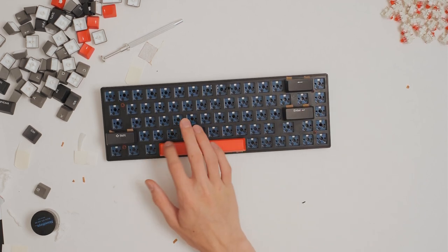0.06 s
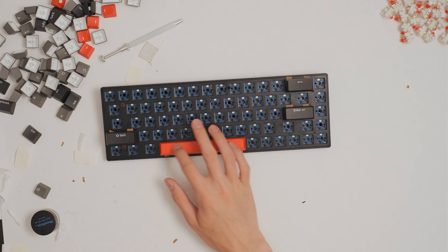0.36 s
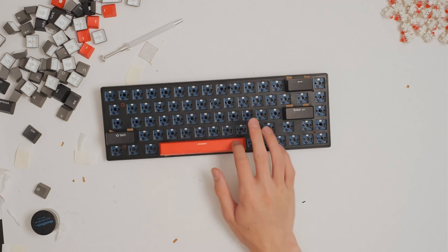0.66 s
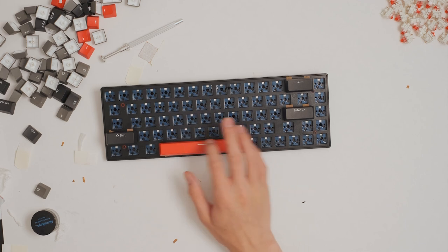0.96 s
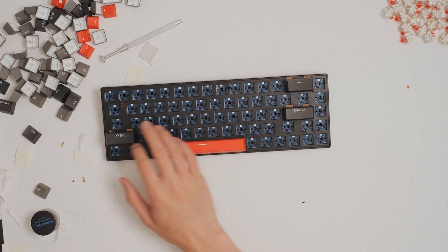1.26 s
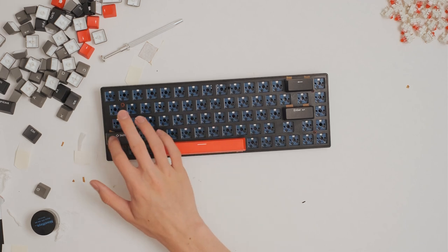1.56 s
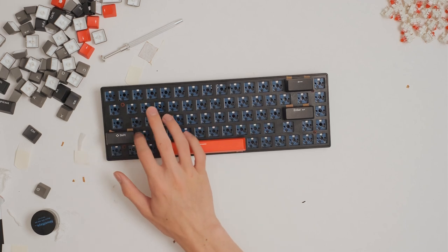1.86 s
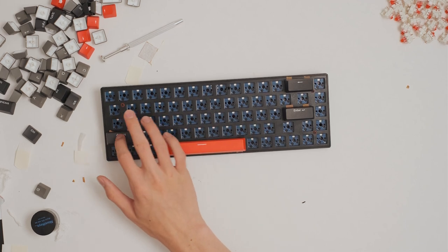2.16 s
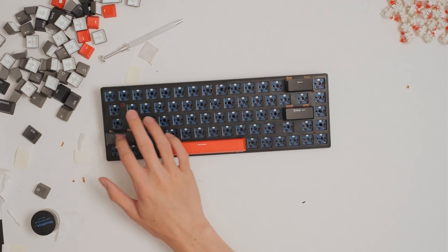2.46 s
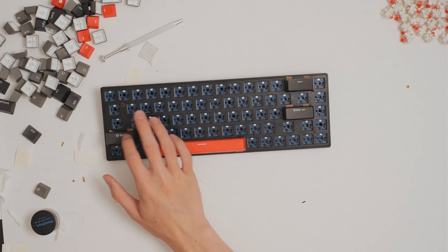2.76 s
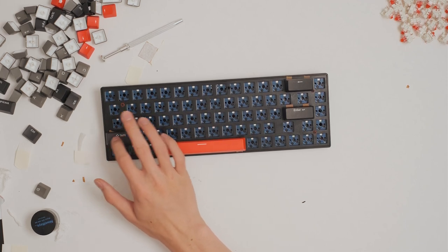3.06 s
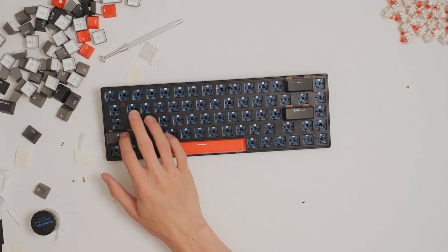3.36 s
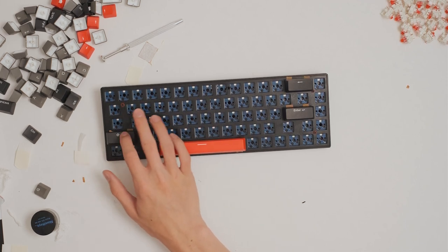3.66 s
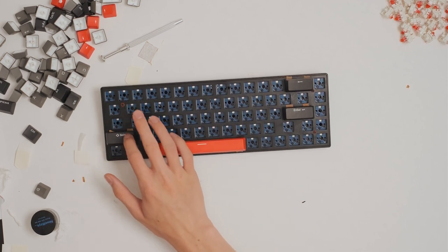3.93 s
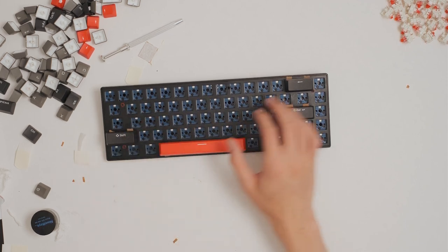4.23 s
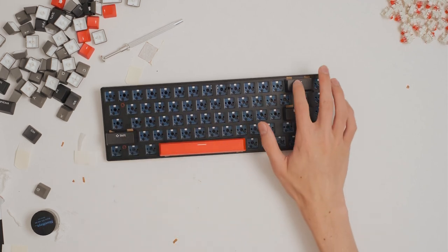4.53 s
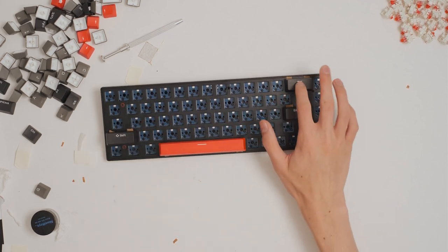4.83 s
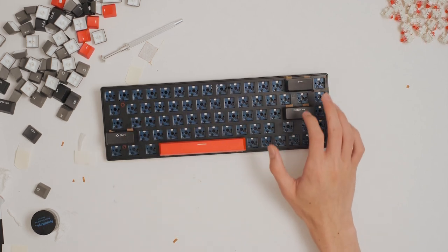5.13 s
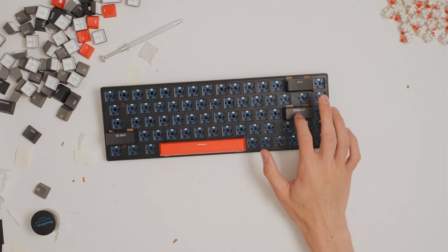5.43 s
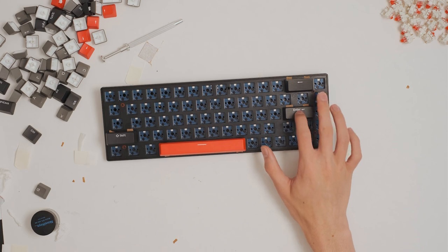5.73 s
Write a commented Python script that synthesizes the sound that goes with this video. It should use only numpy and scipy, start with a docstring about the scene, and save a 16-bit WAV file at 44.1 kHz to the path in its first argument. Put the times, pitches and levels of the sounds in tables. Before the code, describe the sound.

Single keys on a mechanical keyboard are tapped in steady runs: loud clacks, lighter ticks, then a few sharp, rattly clacks.

```python
"""One hand tries the big keys of a mechanical keyboard on a desk, in a small room, almost in mono.
At first the room still rings from an earlier tap. Then come seven taps on the space bar, fifteen on left
shift (with one stray knock), three on backspace (the last makes a spring sing) and three on enter.
In each tap the finger lands and the key's stem slides down and hits bottom: the keycap clacks and the
case thuds. The key then springs back against its top stop. A faint hum lies under it all."""
import sys
import numpy as np
from scipy import signal
from scipy.fft import rfft, irfft
from scipy.io import wavfile

SR = 44100
rng = np.random.default_rng(int(sys.argv[2]) if len(sys.argv) > 2 else 0)


def transcribe(signal):
    """Save signal, clipped to [-1, 1], as a 16-bit WAV file at the path in sys.argv[1]."""
    frames = np.atleast_2d(signal).T
    limited = np.clip(frames, -1, 1)
    pcm = np.round(limited * 32767).astype(np.int16)
    wavfile.write(sys.argv[1], SR, pcm)


N = 264159
AGE = np.arange(int(.18 * SR)) / SR   # seconds since a blow
SPLIT_HZ = 3900   # a keycap's tones clack below this pitch and tick above it

# The tones of the space bar's cap and steadying wire, then of the case struck at the front.
# Ring time, or t60, is how long a sound takes to fade by 60 dB.
# (pitch [Hz], relative energy [dB], ring time [s])
SPACE_CAP = [(1430, -23, 0.0089), (1893, -8.5, 0.0092), (2388, -5, .014), (2707, -4.5, .014),
             (3030, 0.5, 0.0064), (3402, 3.5, 0.019), (3420, -16.5, .17), (3684, -19.5, .16),
             (4380, -18.5, .006), (4990, -6.5, 0.011), (5550, -11, .007), (6760, -19, 0.0059),
             (7930, -25, 0.01457)]
CASE_FRONT = [(135, -12, 0.05), (217, -16, .2), (268.6, -0.5, 0.042), (361, -7.5, 0.029), (336, 2.5, 0.035),
              (483, -5, 0.051)]
# Taps on the space bar. Where the finger lands tilts the clack: a higher tilt weakens its low tones.
# (time [s], press level [dB], time held [s], release level [dB], tilt [dB per octave])
SPACE_TAPS = [(.0625, -35, .0668, -43.5, 4.5), (.2167, -30.5, 0.084, -44, 1.5),
              (.3795, -30, .0867, -44, -12), (.5652, -33, 0.08, -40.5, -2), (.7407, -26, .0864, -53, -1.5),
              (.8884, -26.5, 0.09365, -41.5, -2.5), (1.0827, -28, .099, -46, -9.5)]

def space_bar():
    """The long bar clacks loudest, and its tone changes with the place where the finger lands."""
    key = SPACE_TAPS, SPACE_CAP, CASE_FRONT
    down = presses(*key, thud_db=-9.5, thud_follows=.2, tick_db=-10.5, finger_db=-23, touch_db=-33.5,
                   slide_db=-25, desk_db=-31.5, low_cut_hz=1200, travel_s=.014, case_lag_s=.0033,
                   swell_s=.0023, crack_db=-15, crack_t60=.009, snap_db=-4.5, rattle_db=-15.5)
    return down + releases(*key, thud_db=-2.7, tick_db=-5, case_lag_s=.00268, swell_s=.00057,
                           crack_db=0, crack_t60=.031, snap_db=-4.5)


# The tones of the shift keycap, then of the case struck on the left.
# (pitch [Hz], relative energy [dB], ring time [s])
SHIFT_CAP = [(810, -13, 0.038), (1282, -11.5, 0.043), (1672, -2, 0.035), (1940, -6.5, 0.042),
             (2396, -3.5, 0.017), (3150, -6, 0.013), (3750, -16, 0.014), (4510, 6, 0.013),
             (4940, 8, 0.0052), (6450, 2.5, 0.0092), (6500, -24, 0.02), (6810, 7, 0.0016),
             (10400, -14.5, 0.0036)]
CASE_LEFT = [(209.6, -20, 0.48), (249, -8, 0.2), (280, 2.5, 0.057), (363.2, -0.5, 0.1), (382, 4, 0.013),
             (511, -13.5, 0.077)]
# Taps on left shift: (time [s], press level [dB], time held [s], release level [dB])
SHIFT_TAPS = [(1.5157, -45.5, 0.083, -58.5), (1.6685, -52, 0.085, -60), (1.8424, -50, .0581, -60.5),
              (2.0627, -46, 0.077, -55.5), (2.2297, -50.5, 0.074, -59), (2.3828, -47, .0823, -58.5),
              (2.5493, -49.5, 0.083, -58), (2.7123, -46, 0.096, -56.5), (2.8759, -46.5, 0.078, -58.5),
              (3.0375, -45.5, .0841, -55), (3.2102, -46.5, .0866, -59.5), (3.3895, -43, 0.092, -74),
              (3.5618, -45.5, 0.085, -66.5), (3.7263, -46.5, 0.083, -60.5), (3.9061, -43.5, 0.095, -70.5)]

def left_shift():
    """Light taps make the keycap tick brightly over the thud of the case."""
    key = SHIFT_TAPS, SHIFT_CAP, CASE_LEFT
    down = presses(*key, thud_db=0, thud_follows=1, tick_db=4, finger_db=-13, touch_db=-25,
                   slide_db=-12, desk_db=-23.5, low_cut_hz=400, travel_s=.0135, case_lag_s=.00035,
                   swell_s=.0019, crack_db=-8.5, crack_t60=.014, snap_db=-12, rattle_db=-28.5)
    return down + releases(*key, thud_db=4.5, tick_db=-2, case_lag_s=.0011, swell_s=.0018,
                           crack_db=-1.5, crack_t60=.059, snap_db=-15)


# The tones of the backspace keycap, then of the case struck on the right (enter shares these).
# (pitch [Hz], relative energy [dB], ring time [s])
BACKSPACE_CAP = [(758, -5.5, 0.028), (1040, -10.5, 0.0074), (1715, -2, 0.03), (2150, -6, 0.0084),
                 (2522, -3, 0.027), (3290, -1, 0.0048), (4150, -0.5, 0.018), (4230, -13, 0.17),
                 (4970, -9, 0.0085), (6500, -9, 0.0055), (8700, -13, 0.0012), (11300, -16, 0.0037)]
CASE_RIGHT = [(221.4, -17, 0.22), (256, 5.5, 0.025), (353, -18, 0.18), (483, -5.5, 0.044),
              (506.7, -14, 0.15), (766, -14.5, 0.056)]
# Taps on backspace: (time [s], press level [dB], time held [s], release level [dB])
BACKSPACE_TAPS = [(4.5378, -38, 0.0821, -46), (4.7207, -40, .0853, -52.5), (4.8881, -45.5, .0905, -60)]

def backspace():
    """Each tap is softer than the last; the stem rubs and loose parts rattle."""
    key = BACKSPACE_TAPS, BACKSPACE_CAP, CASE_RIGHT
    down = presses(*key, thud_db=-3, thud_follows=.92, tick_db=-2.1, finger_db=-23, touch_db=-29,
                   slide_db=-7, desk_db=-36, low_cut_hz=440, travel_s=.0062, case_lag_s=.0005,
                   swell_s=.0024, crack_db=-2, crack_t60=.021, snap_db=-5, rattle_db=-10)
    return down + releases(*key, thud_db=2.5, tick_db=-2, case_lag_s=.00092, swell_s=.0043,
                           crack_db=-3, crack_t60=.11, snap_db=-16)


# The tones of the enter keycap: (pitch [Hz], relative energy [dB], ring time [s])
ENTER_CAP = [(777, -16.5, 0.098), (867, -17, 0.03), (1090, -8, 0.02), (1630, -9, 0.012),
             (2323, -1.5, 0.021), (2920, -9.5, 0.0069), (3700, -15.5, 0.0084), (4820, 3, 0.0049),
             (5640, -2.5, 0.0074), (6290, 2.5, 0.0048), (9400, -16.5, .005)]
# Taps on enter: (time [s], press level [dB], time held [s], release level [dB])
ENTER_TAPS = [(5.3854, -33.5, 0.081, -45.5), (5.5526, -48.5, 0.089, -46), (5.7383, -37.5, .1088, -50)]

def enter():
    """The key hits bottom with a sharp tick and comes back up with a duller clack."""
    key = ENTER_TAPS, ENTER_CAP, CASE_RIGHT
    down = presses(*key, thud_db=-3.5, thud_follows=.67, tick_db=2.5, finger_db=-24, touch_db=-30,
                   slide_db=-13.5, desk_db=-36, low_cut_hz=800, travel_s=.0046, case_lag_s=.00068,
                   swell_s=.00095, crack_db=-6, crack_t60=.021, snap_db=-9, rattle_db=-25.5)
    return down + releases(*key, thud_db=-2, tick_db=-14.5, case_lag_s=.0014, swell_s=.002,
                           crack_db=3, crack_t60=.04, snap_db=9)


def presses(taps, cap, case, thud_db, thud_follows, tick_db, finger_db, touch_db, slide_db, desk_db,
            low_cut_hz, travel_s, case_lag_s, swell_s, crack_db, crack_t60, snap_db, rattle_db):
    """The finger lands with a soft thud, equally loud on every tap of a key;
    the scuff, slide and bottom hit grow with the tap's level."""
    out, usual_db = np.zeros(N), np.mean([tap[1] for tap in taps])
    for s, db, _, _, *place_tilt in taps:
        force_db = db - usual_db   # how much harder than usual this press is
        tilt = .5 * force_db + sum(place_tilt)   # dB per octave: harder is brighter
        struck = [(hz, tone_db + tilt * np.log2(min(hz / SPLIT_HZ, 1)), t60) for hz, tone_db, t60 in cap]
        lead_s = travel_s * from_db(-.78 * force_db)   # harder is also quicker
        push_db = usual_db + thud_follows * force_db   # the case feels its share of the extra force
        # on the way down
        add(out, s - lead_s, thud(case, usual_db + finger_db, soft_hz=383, swell_s=.006))
        add(out, s - lead_s, touch(push_db + touch_db, t60=.025, swell_s=.002))
        add(out, s - lead_s, from_db(push_db + slide_db) * slide(cap, lead_s, tick_db - 10.5))
        # at the bottom
        hit = contact(struck, db, db + tick_db, crack_db, crack_t60, snap_db)
        add(out, s, cut(hit, low_cut_hz, "high"))
        add(out, s, from_db(rattle_db) * rattle(db, db + tick_db, t60=.092))
        add(out, s + case_lag_s, thud(case, push_db + thud_db, soft_hz=920, swell_s=swell_s))
        add(out, s, desk_sway(push_db + desk_db, top_hz=55, t60=.3))
    return out


def releases(taps, cap, case, thud_db, tick_db, case_lag_s, swell_s, crack_db, crack_t60, snap_db):
    """The spring throws the stem against its top stop: a looser, more rattly hit."""
    out, usual_db = np.zeros(N), np.median([tap[3] for tap in taps])
    for s, _, held_s, db, *_ in taps:
        push_db = usual_db + .76 * (db - usual_db)   # a gentle release loses more clack than thud
        add(out, s + held_s, contact(cap, db, db + tick_db, crack_db, crack_t60, snap_db))
        add(out, s + held_s + case_lag_s, thud(case, push_db + thud_db, soft_hz=711, swell_s=swell_s))
    return out


def contact(cap, clack_db, tick_db, crack_db, crack_t60, snap_db):
    """Plastic hits plastic: low keycap tones clack over a noisy crack, high ones tick over a snap."""
    low_tones = ring([tone for tone in cap if tone[0] < SPLIT_HZ], spread_db=1.8, detune=.018)
    high_tones = ring([tone for tone in cap if tone[0] >= SPLIT_HZ], spread_db=1.6, detune=.02)
    low_noise = cut(crack(736, 5800, crack_t60), SPLIT_HZ, "low")
    high_noise = crack(3200, 4400, .87 * crack_t60)
    clack = unit_blow(low_tones, .009) + from_db(crack_db) * unit_blow(low_noise, .009)
    tick = unit_blow(high_tones, .009) + from_db(snap_db) * unit_blow(high_noise, .013)
    clack = from_db(clack_db) * unit_blow(cut(clack, 430, "high"), .0057)
    tick = from_db(tick_db) * unit_blow(cut(tick, 2300, "high"), .009)
    return clack + tick


def ring(tones, spread_db, detune):
    """A struck part rings with fading sine waves; each blow shares its energy a little differently."""
    hz, db, t60 = np.transpose(tones)[:, :, None]
    strength, shift = rng.standard_normal((2, len(hz), 1))
    # the finger detunes the tones that it muffles; the long ones keep closer to their pitch
    hz = hz * (1 + detune * shift * np.minimum(1, .02 / t60))
    # low tones move as one piece; neighbouring higher ones swing against each other
    sign = np.where(hz < 750, 1, (-1) ** np.arange(len(hz))[:, None])
    height = sign * from_db(db + spread_db * strength) / np.sqrt(t60)
    return np.sum(height * fade(t60) * np.sin(2 * np.pi * hz * AGE), axis=0)


def crack(low_hz, high_hz, t60):
    """Many tiny, short tones in the switch and its plate blur into a burst of noise."""
    burst = rng.standard_normal(len(AGE)) * fade(t60)
    return cut(cut(burst, low_hz, "high", order=3), high_hz, "low", order=1)


def thud(case, thud_db, soft_hz, swell_s):
    """The case takes a moment to start rocking on its feet; a soft hit leaves out the upper tones."""
    body = ring(case, spread_db=1.6, detune=.05) * (1 - np.exp(-AGE / swell_s))
    body = cut(body, soft_hz, "low")
    body = cut(body, 155, "high", order=1)   # a small case gives off little bass
    return from_db(thud_db) * unit_blow(body, .022)


def slide(cap, travel_s, tick_db):
    """The stem rubs in its housing, louder as it speeds up, and stirs the keycap."""
    speed = np.linspace(.5, 1, int(max(travel_s, .002) * SR))
    keycap = contact(cap, 0, tick_db, crack_db=-4, crack_t60=.006, snap_db=-10)
    rubbing = speed * rng.standard_normal(len(speed))
    return unit_blow(signal.fftconvolve(rubbing, keycap), travel_s)


def rattle(clack_db, tick_db, t60):
    """Shaken by the blow, the loose parts of the other switches buzz briefly."""
    clicks = rng.standard_normal(len(AGE)) * (rng.random(len(AGE)) < 6000 / SR)   # about 6000 a second
    chatter = clicks * fade(t60)
    low = unit_blow(cut(chatter, [1600, 4300], "band"), .05)
    high = unit_blow(cut(chatter, [4200, 8500], "band"), .057)
    return from_db(clack_db + 2.5) * low + from_db(tick_db) * high


def touch(touch_db, t60, swell_s):
    """The fingertip scuffs the keycap and takes up its slack: a faint, bright tick."""
    scuff = crack(2400, 6500, t60) * (1 - np.exp(-AGE / swell_s))
    return from_db(touch_db) * unit_blow(scuff, .01)


def desk_sway(db, top_hz, t60):
    """The desk top sways under a blow with a short, deep rumble."""
    rumble = cut(rng.standard_normal(len(AGE)), top_hz, "low")
    return from_db(db) * fade(t60) * rms_one(cut(rumble, top_hz / 2, "high"))


# A finger knocks the shift key without pressing it all the way: (time [s], level [dB])
KNOCKS = [(1.879, -48.5)]

def stray_knock(clack_db, tick_db):
    """A stray knock is mostly thud, with a light tick of the keycap."""
    out = np.zeros(N)
    for s, db in KNOCKS:
        add(out, s, thud(CASE_LEFT, db, soft_hz=690, swell_s=.0027))
        add(out, s, contact(SHIFT_CAP, db + clack_db, db + tick_db, crack_db=0, crack_t60=.04, snap_db=-9))
    return out


# A spring sings after a blow: (time [s], pitch [Hz], level [dB], ring time [s])
PINGS = [(4.887, 4086, -45.5, 0.069)]

def spring_ping():
    """A steel spring rings on with seven close tones that beat against each other."""
    out = np.zeros(N)
    for s, hz, db, t60 in PINGS:
        offsets = np.linspace(-1, 1, 7) + rng.normal(0, .1, 7)
        tones = [(hz * (1 + .061 * offset), 0, t60) for offset in offsets]   # about 6 % either way
        add(out, s, from_db(db) * unit_blow(ring(tones, spread_db=2, detune=0), .018))
    return out


# How long the room rings: (pitch [Hz], ring time [s])
ROOM_RING_TIMES = [(150, 0.17), (400, 0.41), (1000, 0.25), (3000, 0.38), (7000, 0.36), (15000, 0.42)]
# How loud it rings next to the direct sound: (pitch [Hz], level [dB])
ROOM_LEVELS = [(150, -6.5), (400, -6), (750, 1), (1100, -6.5), (3000, -11), (7000, -10), (15000, -11)]

def room(x, echo_s=.013, echo_db=-18, build_s=.0025):
    """The nearest wall gives one echo, and a wash of echoes dies away band by band."""
    age, edges = np.arange(SR // 2) / SR, np.geomspace(80, 18000, 14)
    noise, tail = rng.standard_normal((2, len(age))), 0
    build_up = 1 - np.exp(-age / build_s)
    for k, (low, high) in enumerate(zip(edges, edges[1:])):
        hz = np.sqrt(low * high)
        band = cut(noise[k % 2], [low, high], "band") * fade(at_hz(ROOM_RING_TIMES, hz), age) * build_up
        band *= np.sqrt(2 * (high - low) / SR / np.sum(band ** 2))   # as strong as the direct sound
        tail = tail + from_db(at_hz(ROOM_LEVELS, hz)) * band
    tail[round(echo_s * SR)] += from_db(echo_db)
    return signal.fftconvolve(x, tail)[:N]


# Low tones of desk and room, next to the direct sound: (pitch [Hz], level [dB], ring time [s])
ROOM_TONES = [(219.3, -7.5, .3), (348, -10, 0.11), (516.6, -5.5, .14), (835, -9.5, 0.092)]

def room_tones(x):
    """A few low tones of the desk and the room hum on after each blow."""
    out = np.zeros(N)
    for hz, db, t60 in ROOM_TONES:
        kept = from_db(-60 / (t60 * SR))   # share of the swing left after one sample
        gain = (1 - kept ** 2) / 2
        feedback = [1, -2 * kept * np.cos(2 * np.pi * hz / SR), kept ** 2]
        out += from_db(db) * signal.lfilter([gain, 0, -gain], feedback, x + 1e-18)
    return out


def lingering(clack_db, thud_db, ago_s):
    """At the start the room still rings from an earlier tap on the space bar."""
    tap = np.zeros(N)
    add(tap, 0, contact(SPACE_CAP, clack_db, clack_db - 7, crack_db=6, crack_t60=.02, snap_db=-5))
    add(tap, 0, thud(CASE_FRONT, thud_db, soft_hz=880, swell_s=.0034))
    gone = round(ago_s * SR)
    return np.pad(room(tap)[gone:], (0, gone))


# The soft noise of still air: (pitch [Hz], relative level [dB])
AIR = [(15, -42.5), (25, -20), (64, -5.5), (82, -20.5), (114, -2), (170, -12.5), (212, -9), (242, -4),
       (545, -12.5), (591, -8.5), (641, -11), (887, -19), (988, -18), (1400, -23.5), (8700, -32),
       (9700, -27), (10700, -31), (16000, -34)]
# The tones of the hum: (pitch [Hz], level [dB])
HUM = [(59, -79.5), (119, -92.5), (210, -75), (352, -86.5)]

def background():
    """Still air with a wavering hum, and a trace of rumble and hiss that differs between the ears."""
    air_shape = from_db(at_hz(AIR, np.arange(N // 2 + 1) * SR / N))
    air = from_db(-70.5) * rms_one(irfft(rfft(rng.standard_normal(N)) * air_shape, N))
    hum = sum(from_db(db) * rms_one(cut(rng.standard_normal(N), [hz - 4, hz + 4], "band"))
              for hz, db in HUM)
    rumble = from_db(-87) * rms_one(cut(rng.standard_normal((2, N)), 110, "low", order=1))
    hiss = from_db(-82) * rms_one(cut(rng.standard_normal((2, N)), 4000, "high", order=1))
    return air + hum + rumble + hiss


def from_db(db):
    """Turn decibels into a number to multiply by."""
    return 10 ** (np.asarray(db) / 20)


def fade(t60, age=AGE):
    """A fade that drops by 60 dB every t60 seconds."""
    return from_db(-60 * age / t60)


def rms_one(x):
    """Scale a sound so that its average strength (rms) is 1."""
    return x / np.sqrt(np.mean(x ** 2) + 1e-20)


def unit_blow(x, length_s):
    """Scale a blow so that its first length_s seconds hold the energy of 10 ms at rms 1."""
    return x / np.sqrt(np.sum(x[:int(length_s * SR)] ** 2) / (.01 * SR) + 1e-20)


def at_hz(points, hz):
    """Read between the rows of a table, with pitch counted in octaves."""
    pitches, values = np.transpose(points)
    return np.interp(np.log(np.maximum(hz, 1)), np.log(pitches), values)


def cut(x, hz, keep, order=2):
    """Filter a sound, keeping its "low" part, its "high" part or a "band"."""
    sections = signal.butter(order, np.clip(hz, 10, .45 * SR), keep, fs=SR, output="sos")
    return signal.sosfilt(sections, x)


def add(track, s, sound):
    """Mix a sound in at time s."""
    start = max(0, round(s * SR))
    track[start:start + len(sound)] += sound[:N - start]


def scene():
    """Four keys in turn, on the same desk in the same room."""
    keys = space_bar() + left_shift() + backspace() + enter()
    keys += stray_knock(clack_db=-11.5, tick_db=-5) + spring_ping()
    echoes = room(keys) + room_tones(keys) + lingering(clack_db=-27.5, thud_db=-31, ago_s=.13)
    return keys + echoes + background()


def record(dry):
    """The treble above 16000 Hz is cut steeply."""
    return signal.sosfilt(signal.ellip(10, .1, 80, 16000, fs=SR, output="sos"), dry)


dry = scene()
out = record(dry)
transcribe(out)
```